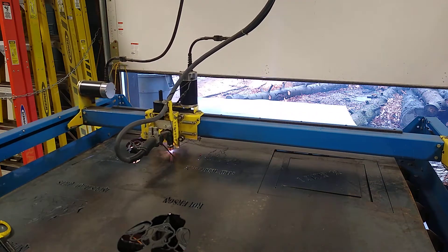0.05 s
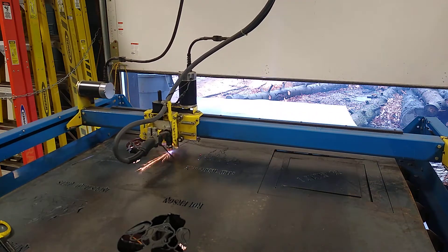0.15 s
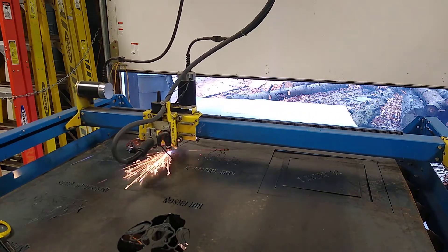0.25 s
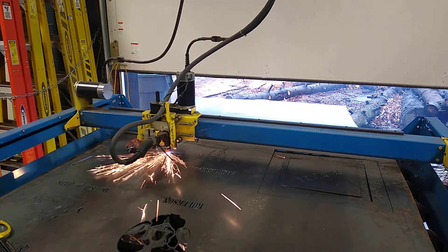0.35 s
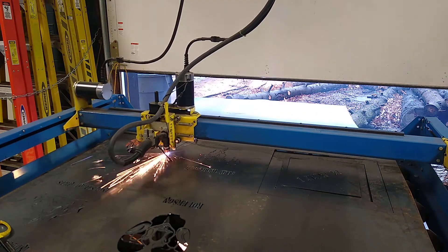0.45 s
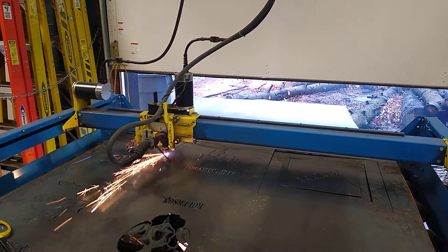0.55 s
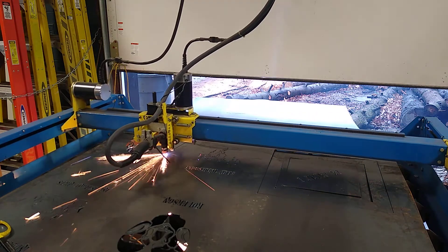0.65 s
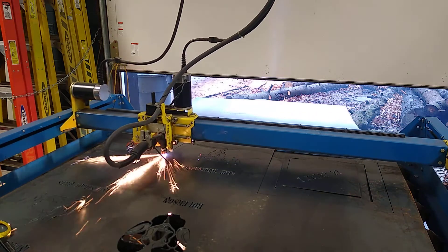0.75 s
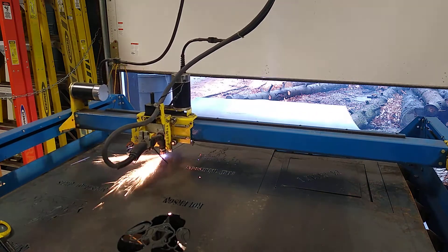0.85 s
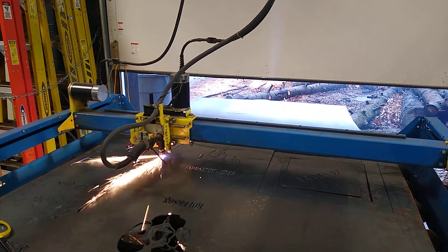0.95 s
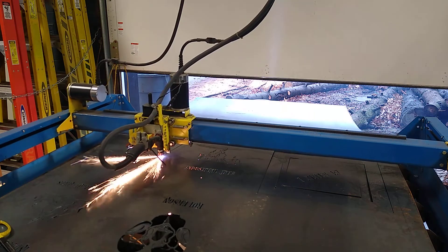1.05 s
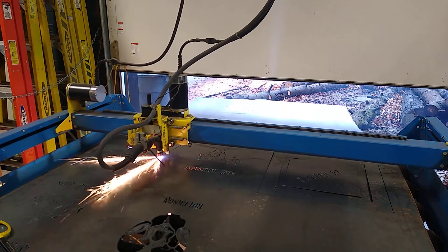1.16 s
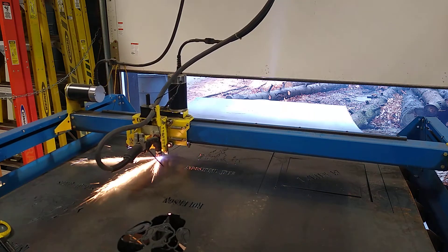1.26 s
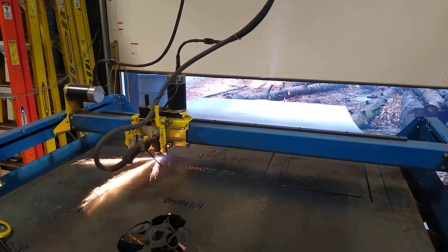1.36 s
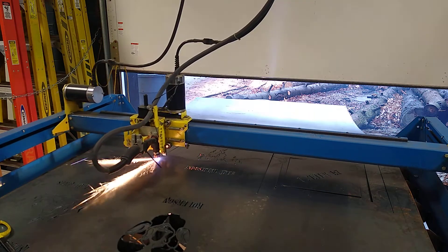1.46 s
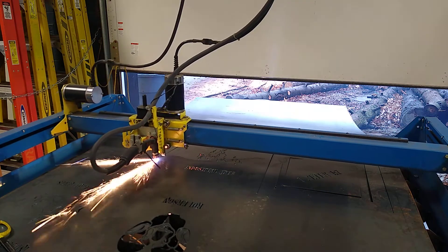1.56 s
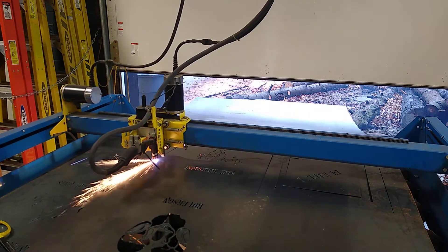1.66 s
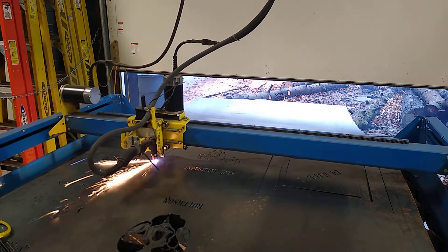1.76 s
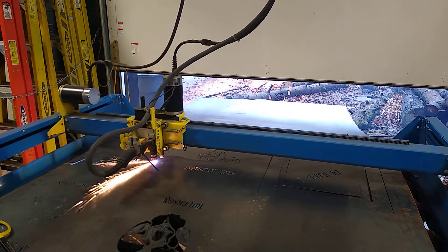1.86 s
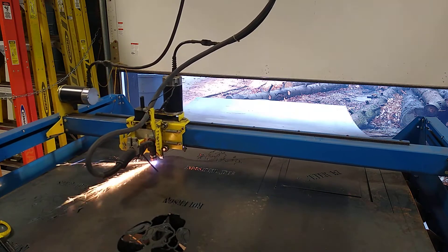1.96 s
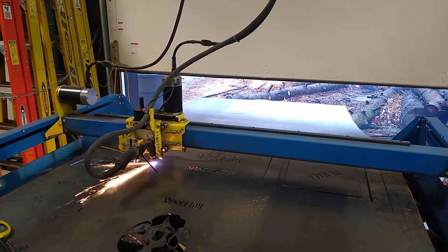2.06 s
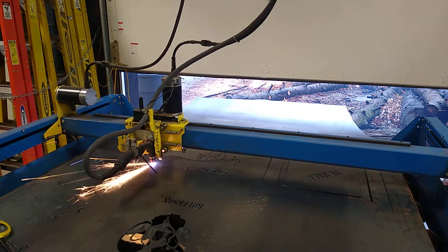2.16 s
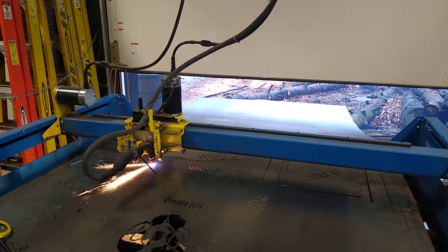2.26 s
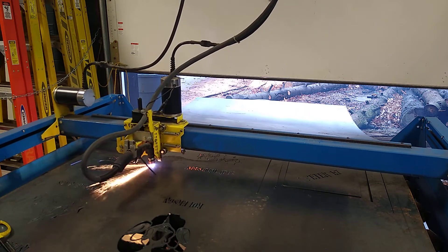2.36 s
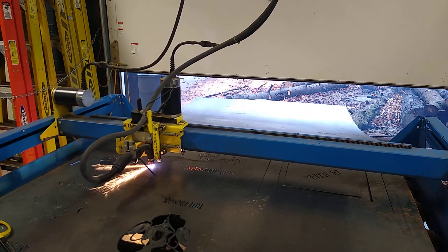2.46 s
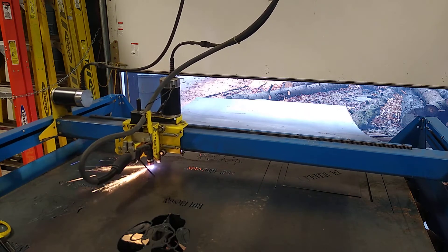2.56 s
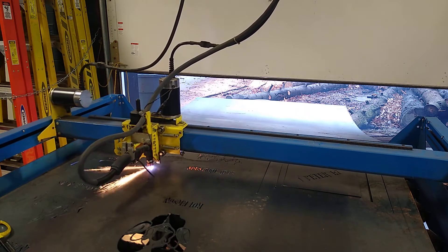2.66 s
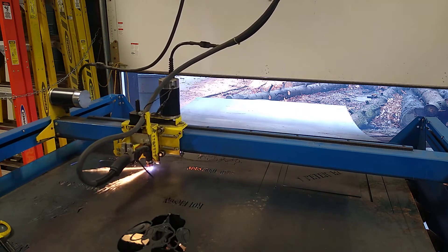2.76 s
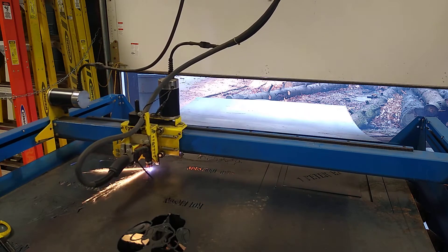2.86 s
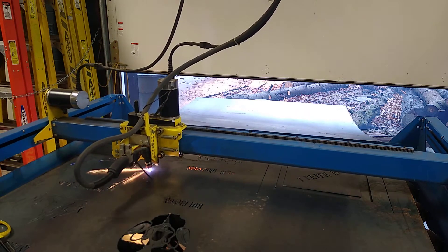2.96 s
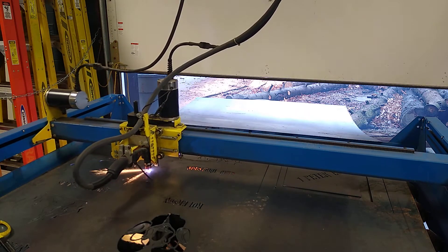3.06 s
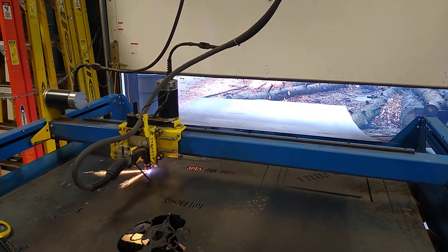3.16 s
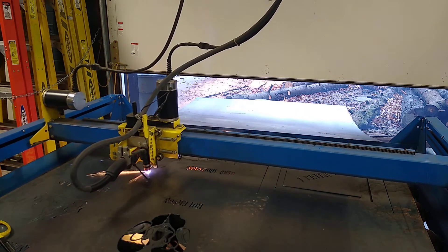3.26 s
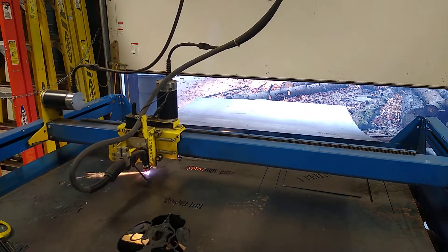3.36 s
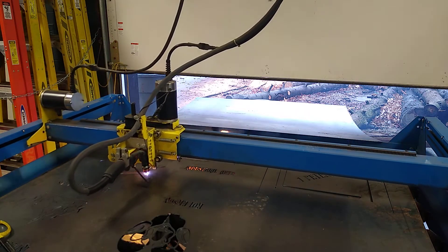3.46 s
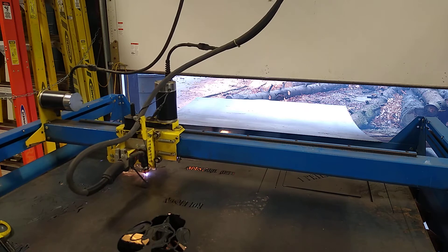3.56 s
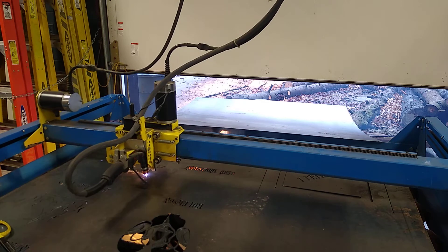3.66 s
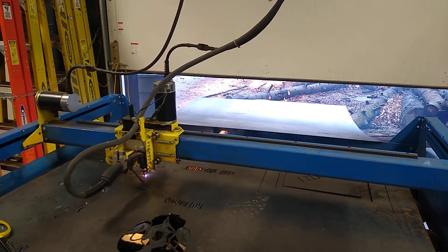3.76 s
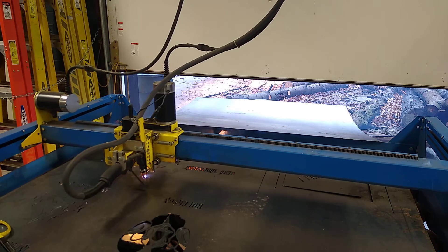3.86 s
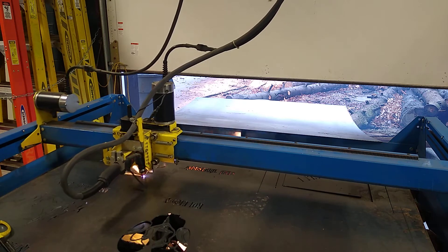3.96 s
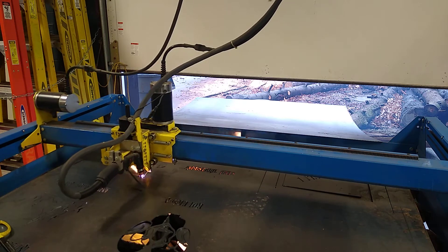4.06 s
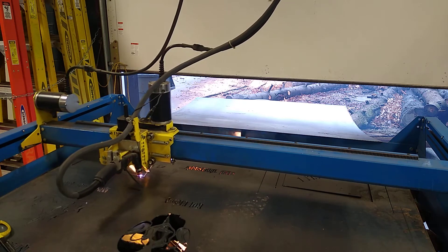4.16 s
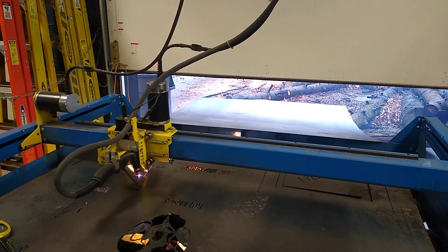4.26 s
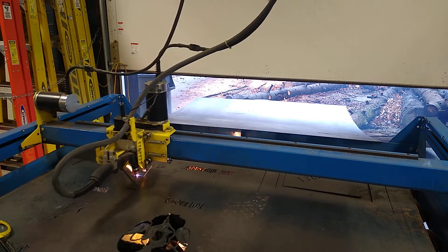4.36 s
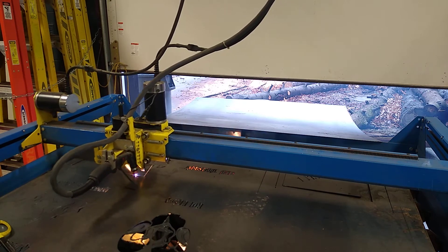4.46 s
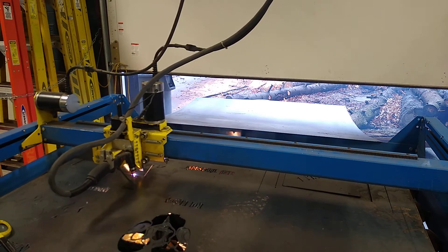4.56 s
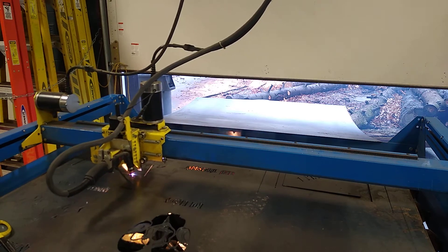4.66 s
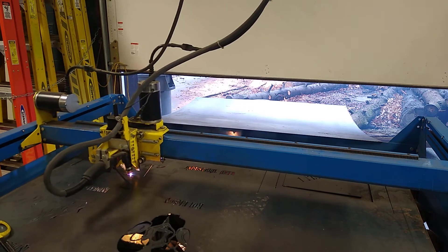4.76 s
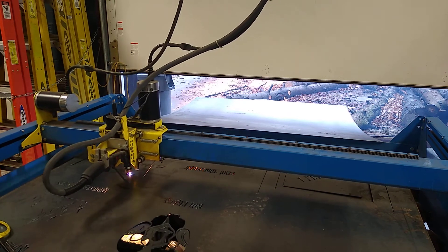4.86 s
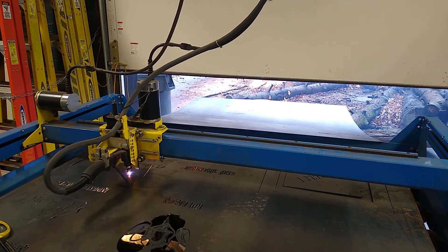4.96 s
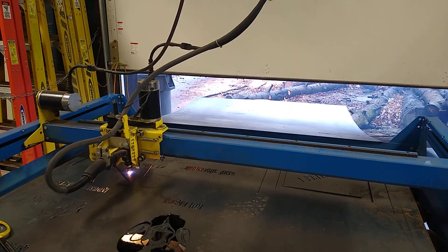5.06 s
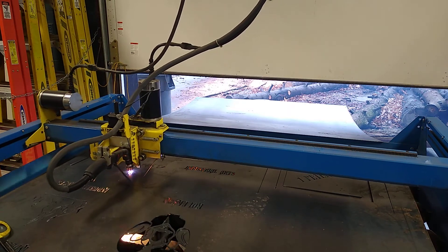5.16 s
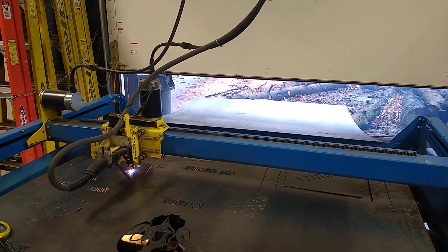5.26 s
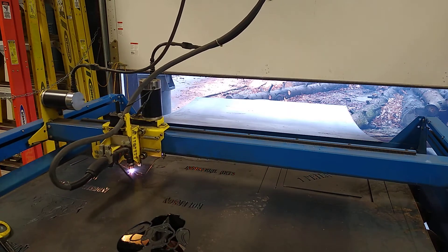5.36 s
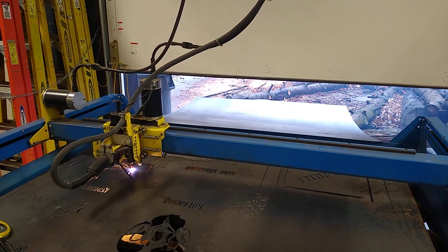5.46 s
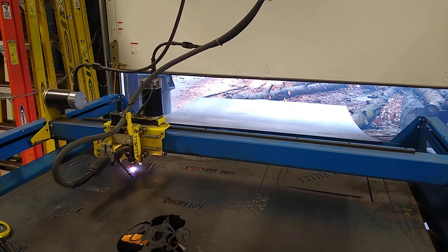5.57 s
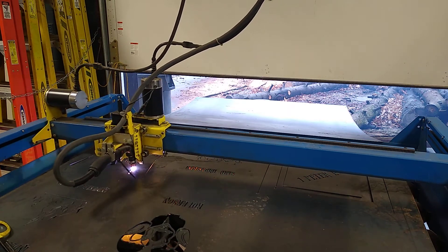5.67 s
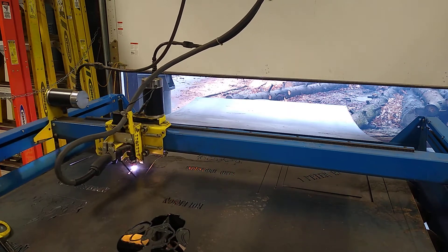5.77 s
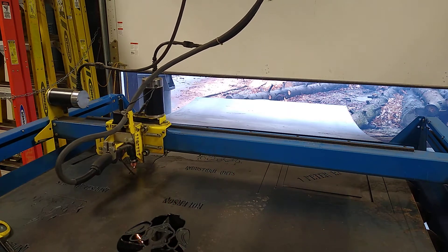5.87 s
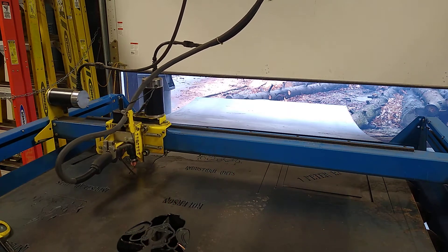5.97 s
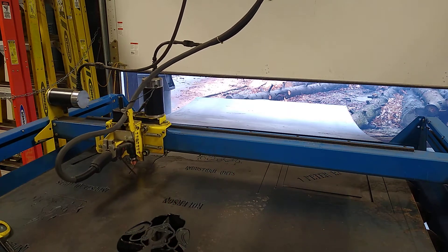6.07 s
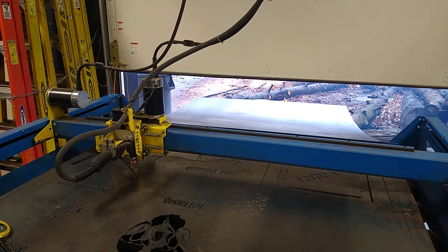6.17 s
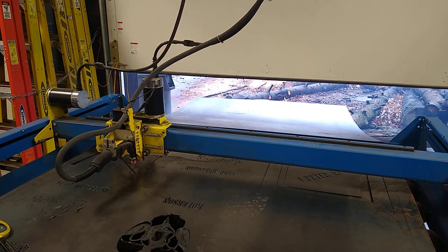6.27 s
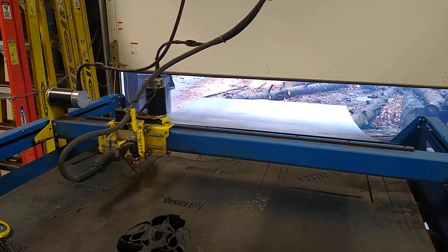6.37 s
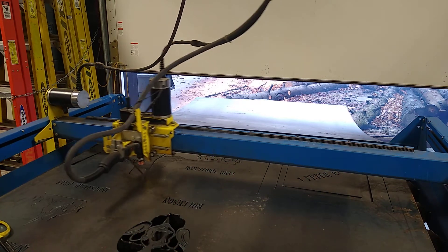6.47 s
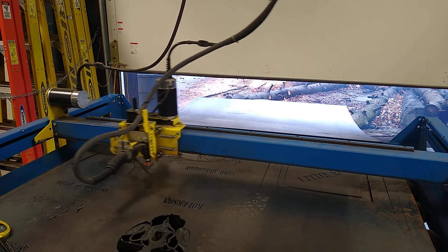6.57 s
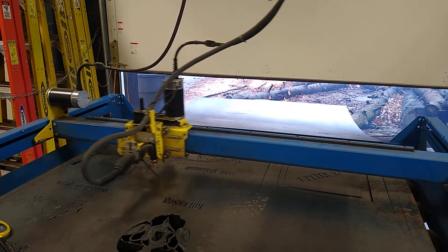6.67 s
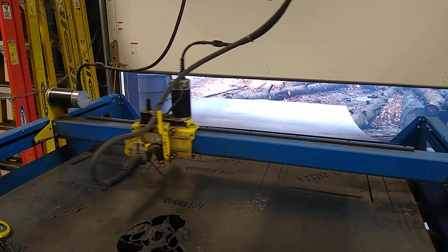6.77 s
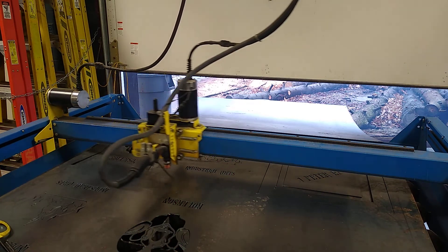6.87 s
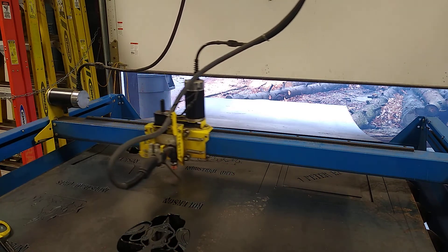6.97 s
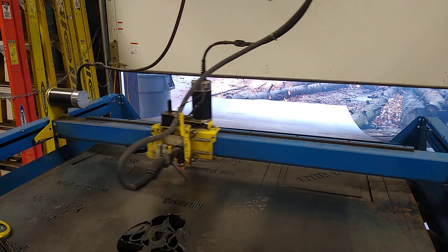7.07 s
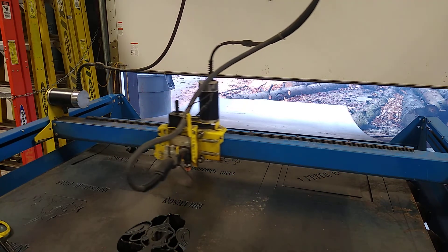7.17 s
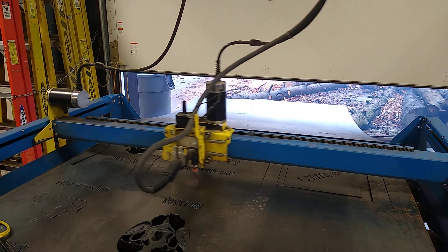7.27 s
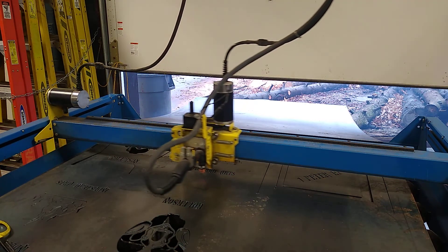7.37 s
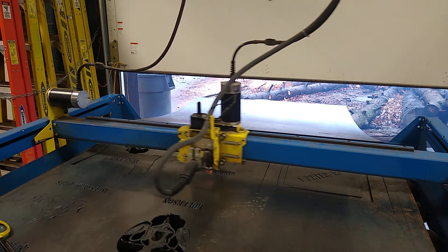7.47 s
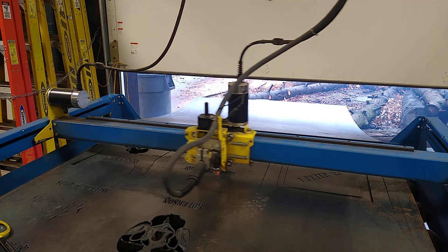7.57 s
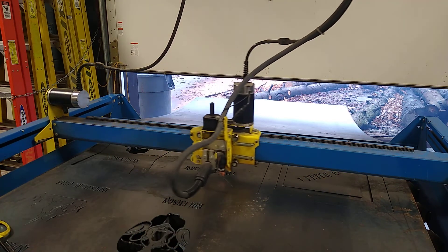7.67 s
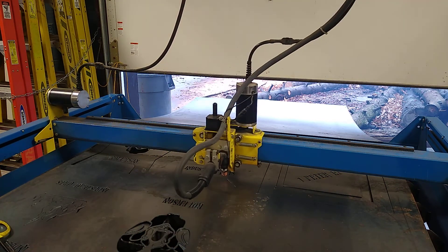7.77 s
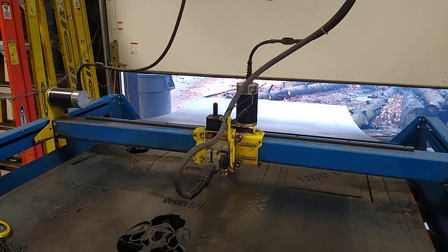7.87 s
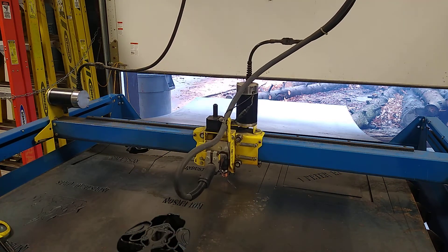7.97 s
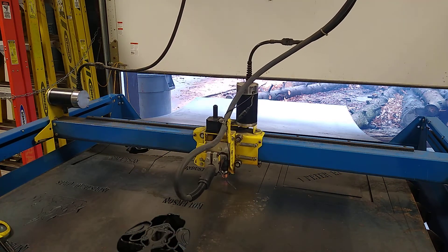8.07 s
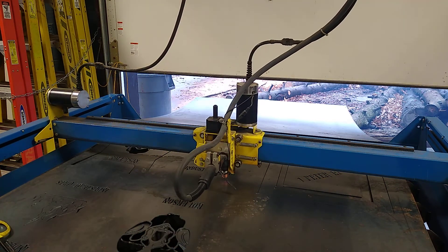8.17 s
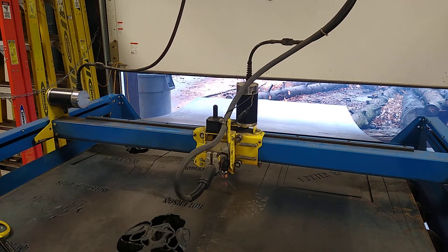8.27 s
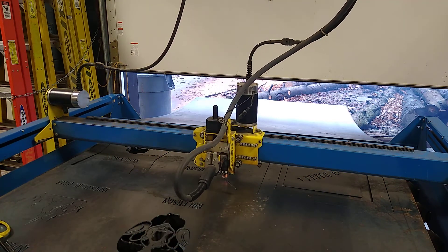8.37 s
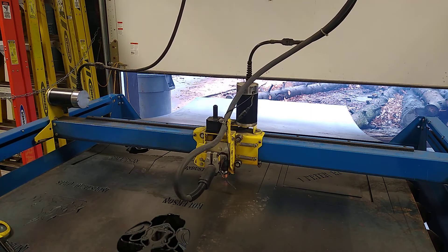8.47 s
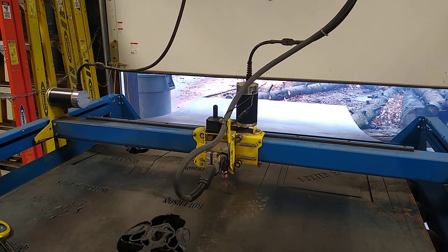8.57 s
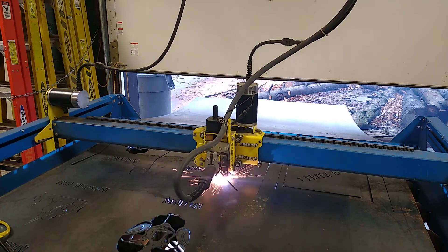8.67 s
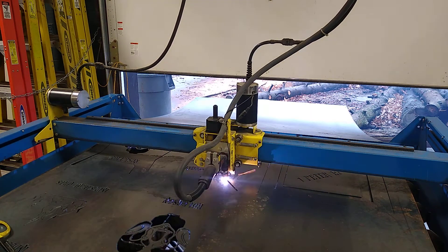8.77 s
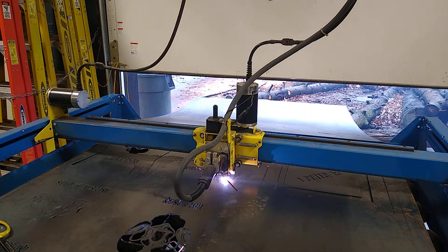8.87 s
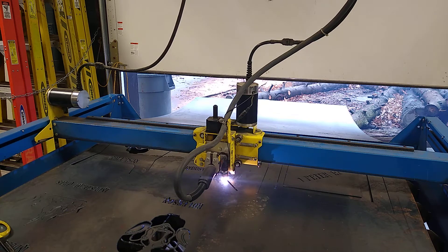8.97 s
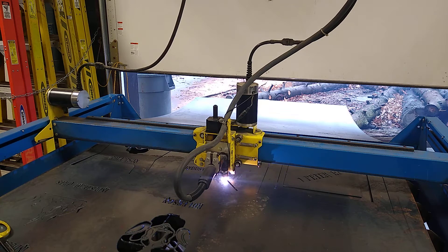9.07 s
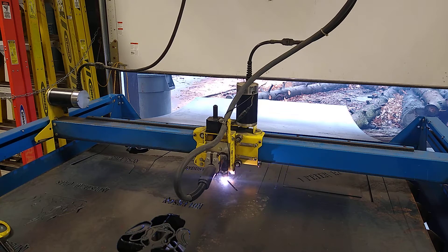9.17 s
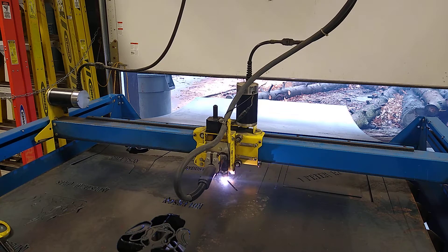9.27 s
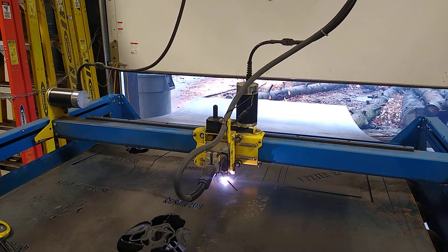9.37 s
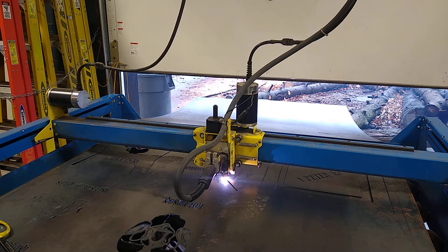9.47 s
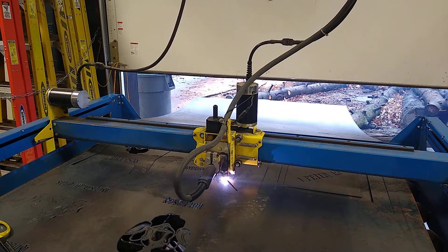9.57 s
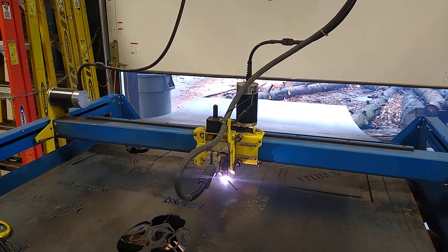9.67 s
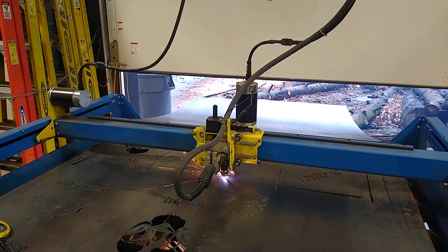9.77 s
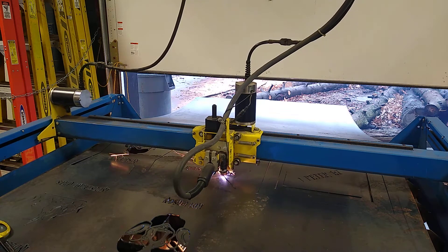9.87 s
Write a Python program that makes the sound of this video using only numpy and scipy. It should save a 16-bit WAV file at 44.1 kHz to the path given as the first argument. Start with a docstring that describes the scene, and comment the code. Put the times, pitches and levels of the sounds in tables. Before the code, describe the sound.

Steady airy hiss with a thin whistle and crackling roar of plasma cutting, arc out, air shut off, sharp relighting snaps and loud bright hiss, machinery droning.

```python
"""A workshop, where a gantry plasma torch cuts steel plate over an air compressor's drone and a mains hum.
The air jet is shaped noise that hisses, with moving resonances that whistle in the kerf.
The arc is sputtering noise that roars most in its flares; it goes out and the air keeps blowing as the torch travels.
The air dies away, then snaps of resonant noise relight the arc, which pierces a new hole with a bright hiss.
The compressor repeats a stroke built from partials; hum, motor whines and fan noise fill the background."""
import sys
import numpy as np
from scipy import signal
from scipy.fft import rfft, irfft, next_fast_len
from scipy.io import wavfile
from scipy.ndimage import uniform_filter1d, map_coordinates

SR = 44100
rng = np.random.default_rng(int(sys.argv[2]) if len(sys.argv) > 2 else 0)


def generate_wav(sig):
    """Save sig (samples, or channels by samples) to the path in sys.argv[1] as 16-bit PCM at SR."""
    pcm = np.round(np.clip(np.atleast_2d(sig).T, -1, 1) * 32767).astype(np.int16)
    wavfile.write(sys.argv[1], SR, pcm)


N = 437472
T = np.arange(N) / SR  # time of each sample in seconds

# The torch's cycle in seconds: the cutting arc goes out, the air valve shuts and reopens,
# the new arc takes hold and starts to sink through.
ARC_OFF_S, AIR_OFF_S, AIR_ON_S, PIERCE_S, SINK_S = 5.97, 8.375, 8.706, 8.778, 9.66
# The whistle's pitch drifts as the torch moves along. Each row: time in seconds, pitch in Hz.
KERF_PITCH = [(0.7, 5074), (3.5, 4936), (5.4, 4756), (5.75, 4865), (6.3, 4716), (8.3, 4910)]
# Resonances of the gap under the nozzle. Each row: multiple of the whistle pitch, width in Hz,
# relative level in dB.
GAP_MODES = [(.76, 220, -11.5), (1, 170, -4.5), (1.06, 150, -7.5), (1.17, 290, -17), (1, 930, -2.5)]
# The arc flares as it meets fresh metal. Each row: start in seconds, length in seconds,
# rise and fall in seconds, then the relative levels of hiss, roar and whistle in dB.
FLARES = [(0.216, 0.16, 0.1, -36, -32.5, -31), (0.44, 0.285, 0.055, -32, -34.5, -25),
          (0.603, 0.1, 0.065, -38, -33, -20), (1.548, 0.13, 0.1, -37, -31, -30),
          (1.714, 0.75, 0.37, -37.5, -35.5, -33), (3.445, 0.16, 0.06, -35, -37, -29.5),
          (5.08, 0.22, 0.12, -46, -37.5, -36), (5.38, 0.575, 0.04, -35, -36, -30.5),
          (5.588, 0.3, 0.08, -43.5, -29.5, -35), (5.669, 0.085, 0.056, -33.5, -26.5, -23.5)]
# Puffs of air with the arc out. Each row: start in seconds, length in seconds, rise in seconds,
# fall in seconds, relative level in dB.
AIR_PUFFS = [(5.98, 0.37, 0.34, 0.14, -39), (6.302, 0.065, 0.05, 0.04, -37),
             (8.275, 0.037, 0.027, 0.13, -35)]
# The crater rings until the arc breaks through. The one row: start in seconds, length in seconds,
# rise in seconds, fall in seconds, relative level in dB.
CRATER_RING = (9, 0.7, 0.3, 0.12, -38)
# Ignition snaps. Each row: start in seconds, relative level in dB, rise time constant in seconds,
# time to decay by 60 dB in seconds, centre in Hz, width in Hz.
SNAPS = [(8.7245, -10, 0.0015, 0.014, 3200, 2380), (8.741, -21.5, 0.0024, 0.08, 4900, 1400),
         (8.7507, -13.5, 0.00054, 0.018, 4480, 2000)]
# Noise colours of the air jet, the cutting roar, the piercing flame, the spatter and the shop's fans.
# Each row: frequency in Hz, relative spectrum level in dB per Hz.
AIR_COLOUR = [(150, -45), (500, -20.5), (1000, -6), (1700, 0.5), (2400, -0.5), (3100, 2), (3420, 5),
              (3700, 2.5), (4400, 4), (5300, 4), (6100, 0), (6800, 0.5), (7400, 0.5), (8500, -7.5)]
ROAR_COLOUR = [(120, -44), (400, -23.5), (900, -5), (1350, -11.5), (1600, 0), (1900, 2), (2300, -3.5),
               (2650, 1), (3000, -1), (3450, -2), (4400, 0), (6000, -13), (8000, -21)]
FLAME_COLOUR = [(500, -59), (2400, -11.5), (2850, -9), (3250, -11), (3900, -3), (4300, -3), (4720, 1),
                (5100, 0.5), (5700, -4.5), (5950, -2.5), (6300, -6), (7200, -7.5), (7700, -14.5),
                (8600, -18)]
SPATTER_COLOUR = [(100, -45), (250, -16), (500, -6.5), (1050, -2), (1350, -4.5), (1650, 1.5), (2050, -3),
                  (2850, -3), (3300, -7), (6000, -17), (8600, -25)]
SHOP_COLOUR = [(20, -56), (45, -19.5), (90, -9.5), (140, -0.5), (300, -8), (420, -1), (520, -3),
               (700, -0.5), (1200, 0.5), (1700, 0.5), (2500, -4.5), (3400, -3.5), (5000, -8.5), (6500, -23),
               (8400, -30)]
SHAFT_HZ = 22.603
# The compressor's strong partials. Each row: multiple of the shaft speed, relative level in dB.
PUMP_PARTIALS = [(4, -51.5), (8, -59.5), (10, -51.5), (12, -53), (14, -51), (15, -54.5), (16, -54),
                 (18, -44.5), (19, -53), (27, -49.5), (29, -46.5), (30, -50.5), (31, -40), (32, -57),
                 (33, -45.5), (34, -52.5), (42, -49.5), (48, -49), (49, -53), (50, -52.5), (52, -47.5),
                 (53, -51), (54, -45), (55, -46.5), (57, -55.5), (66, -55.5), (67, -51), (68, -55.5),
                 (69, -52), (71, -57.5)]
# Its loudest partial swells and sinks. Each row: time in seconds, relative level in dB.
DRONE_SWELL = [(0, -45.5), (1.8, -42.5), (3.5, -39), (5.4, -39.5), (6.5, -37), (7.7, -38), (8.6, -47.5),
               (9.1, -55), (9.92, -50)]
# Outline of its weak partials. Each row: frequency in Hz, relative level in dB of each partial.
PUMP_BED = [(25, -87), (70, -67.5), (150, -57.5), (450, -60.5), (1000, -68.5), (1700, -56), (2400, -61.5),
            (3400, -63), (4500, -67.5)]
# The duller drone. Each row: frequency in Hz, relative level in dB of each partial.
DULL_PUMP = [(25, -85), (60, -70.5), (90, -54), (200, -61), (320, -53), (400, -56), (550, -63),
             (660, -45.5), (800, -72), (1250, -58.5), (2500, -68), (4300, -73)]
# Late on the drone turns duller and more even: start and length of the change in seconds,
# share of the duller colour (0-1).
DULL_S, DULL_OVER_S, DULL_SHARE = 8.9, 0.57, 0.59
MAINS_HZ = 60
# Harmonics of the hum. Each row: multiple of the mains frequency, level in dB.
HUM = [(2, -44.5), (3, -56), (4, -61.5)]
# Wavering whines and whistles of motors and fans, and last a steady resonance of the torch nozzle. # Each row:
# frequency in Hz, width in Hz, level in dB.
WHINES = [(168, 0.43, -60.5), (948, 9.7, -53.5), (1222, 12, -52.5), (2010, 1.1, -57.5),
          (2180, 1.1, -51), (3392, 70, -46.5)]
# The microphone's treble. Each row: frequency in Hz, gain in dB.
MIC_TREBLE = [(7000, 0.5), (7700, 3.5), (8000, -5.5), (8300, -11.5), (8600, -35)]
TOP_HZ = 8600  # the microphone's band limit


def air_jet(jet_db=5, whistle_db=-2, flutter_db=0.6, spread_db=-0.25, cut_hiss_db=-42.0,
            cut_whistle_db=-37, free_whistle_db=4.0, even_db=-32):
    """The nozzle hisses; where the jet strikes the kerf edge it adds a breathy whistle."""
    air = blowing()
    hiss_gain = together([air, cutting(cut_hiss_db, column_index=0)])
    hiss = amp(jet_db) * hiss_gain * rush(AIR_COLOUR, patchy_db=0.83)
    edge_gain = together([amp(free_whistle_db) * air, cutting(cut_whistle_db, column_index=2)])
    edge_db = 20 * np.log10(edge_gain)
    edge_hz, = curves(KERF_PITCH)
    modes = [amp(db) * resonance(ratio * edge_hz, width_hz) for ratio, width_hz, db in GAP_MODES]
    # the harder the jet strikes, the less the last, broad resonance counts: the whistle gets purer
    breath_gain = amp(spread_db * (edge_db - even_db))
    whistle = sum(modes[:-1]) + breath_gain * modes[-1]
    return hiss + amp(edge_db + whistle_db + flutter_db * wobble(90)) * whistle


def blowing(flow_db=-43, bleed_db_per_s=105, open_s=0.04):
    """Gain of the plain air flow: steady with a few puffs; the hose bleeds empty while the valve is shut."""
    bleeding = amp(-bleed_db_per_s * np.maximum(T - AIR_OFF_S, 0))
    valve = np.maximum(bleeding, ramp(AIR_ON_S, open_s))
    puffs = [amp(db) * swell(*shape) for *shape, db in AIR_PUFFS]
    return together([amp(flow_db) * valve] + puffs)


def cutting_arc(steady_db=-39, sputter_db=1.46):
    """Molten steel blown from the cut roars and sputters, most when the arc meets fresh metal."""
    sputter = amp(sputter_db * wobble(160))
    return cutting(steady_db, column_index=1) * sputter * rush(ROAR_COLOUR, patchy_db=1.5)


def cutting(steady_db, column_index, out_s=0.055, wander_db=0.5):
    """Gain of one voice of the cut: burning that wanders until the arc goes out, plus the flares."""
    steady = amp(steady_db + wander_db * wobble(5.6)) * (1 - ramp(ARC_OFF_S, out_s))
    flares = [amp(levels[column_index]) * swell(start, length, edge, edge)
              for start, length, edge, *levels in FLARES]
    return together([steady] + flares)


def piercing_arc(flame_db=-22, rise_s=0.062, grow_db_per_s=1.8, sink_db_per_s=22, spray_db=-36.5,
                 spray_db_per_s=5, sputter_db=0.6, surge_db=0.45, crater_hz=1550):
    """The arc digs into fresh plate: bright hiss fading as it sinks in, growing spatter, hollow crater note."""
    age = np.maximum(T - PIERCE_S, 0)
    sinking_db = sink_db_per_s * np.maximum(T - SINK_S, 0)
    hiss_db = flame_db + grow_db_per_s * age - sinking_db + surge_db * wobble(12)
    hiss = amp(hiss_db + sputter_db * wobble(120)) * rush(FLAME_COLOUR, patchy_db=0.5)
    spatter = amp(spray_db + spray_db_per_s * age) * rush(SPATTER_COLOUR, patchy_db=2.5)
    *shape, ring_db = CRATER_RING
    crater = amp(ring_db) * swell(*shape) * resonance(crater_hz, width_hz=73)
    return (hiss + spatter) * ramp(PIERCE_S, rise_s) + crater


def pilot_arc(hiss_db=-37, spit_db=-33, length=0.045, rise=0.028, fall=0.06):
    """A small flame hisses and spits between the first snap and the full arc."""
    hiss = amp(hiss_db) * rush(FLAME_COLOUR, patchy_db=3.0)
    spit = amp(spit_db) * rush(SPATTER_COLOUR, patchy_db=2.5)
    return swell(SNAPS[0][0], length, rise, fall) * (hiss + spit)


def ignition(low_hz=450):
    """The pilot arc strikes in a few short snaps of resonant noise, thinned by a low cut."""
    snaps = np.zeros(N)
    for start, db, rise, t60, centre_hz, width_hz in SNAPS:
        age = np.maximum(T - start, 0)
        envelope = amp(db - 60 * age / t60) * (1 - np.exp(-age / rise))
        snaps += envelope * resonance(centre_hz, width_hz)
    return filtered(snaps, lambda hz: (1j * hz / (low_hz + 1j * hz)) ** 2)


def reflections(x, echo_db, reach, travel, count=8):
    """Plate, gantry and door return weak early copies, whose paths creep as the torch moves."""
    creep = travel * wobble(0.99)  # seconds
    delays = rng.uniform(0.000997, reach, count)  # seconds
    sways = rng.standard_normal(count)
    signs = rng.choice([-1, 1], count)
    copies = sum(sign * np.interp(T - delay - sway * creep, T, x, left=0)
                 for delay, sway, sign in zip(delays, sways, signs))
    return (x + amp(echo_db) * copies / np.sqrt(count)) / np.hypot(1, amp(echo_db))


def compressor(drift=0.0012, flutter_db=0.48, drone_db=-1.0, order=31, count=190, size=8192):
    """Each turn of the shaft repeats one rattling pump stroke, rich in partials."""
    partial_hz = np.arange(count) * SHAFT_HZ
    turns = SHAFT_HZ * T + drift * wobble(3)
    # the shaft speed ripples within each turn, so the drone wavers in pitch rather than level and hardly throbs
    phases = 1.2 * np.arange(count) ** 2 + .4 * rng.standard_normal(count)

    def strokes(gains):
        """One turn built from these partials, repeated at the shaft speed."""
        cycle = irfft(gains * np.exp(1j * phases), size) * size / np.sqrt(2)
        return np.interp(turns % 1, np.arange(size) / size, cycle)

    strong, strong_db = np.transpose(PUMP_PARTIALS)
    gains = amp(along(PUMP_BED, partial_hz))
    gains[np.rint(strong).astype(int)] = amp(strong_db)
    gains[order] = 0  # the loudest partial has its own swell
    swell_db, = curves(DRONE_SWELL)
    drone = amp(swell_db + drone_db) * np.sqrt(2) * np.cos(2 * np.pi * order * turns + phases[order])
    dull_gains = amp(along(DULL_PUMP, partial_hz))
    dull = DULL_SHARE * ramp(DULL_S, DULL_OVER_S)
    rattle = (1 - dull) * strokes(gains) + dull * strokes(dull_gains)
    return rattle * amp(flutter_db * wobble(14)) + drone


def workshop(air_db=-35.5):
    """Transformer hum as sines, motor whines and the nozzle's ring as narrow wavering resonances, and fans as
    shaped noise."""
    hum = sum(amp(db) * np.sin(2 * np.pi * (round(multiple) * MAINS_HZ * T + rng.random()))
              for multiple, db in HUM)
    whines = sum(amp(db) * resonance(hz, width_hz) for hz, width_hz, db in WHINES)
    fans = amp(air_db) * rush(SHOP_COLOUR, patchy_db=1.5)
    return np.sqrt(2) * hum + whines + fans


def rush(spectrum, patchy_db):
    """Turbulent noise of rms 1, with eddies of random gain in time and frequency."""
    z = signal.stft(rng.standard_normal(N), nperseg=512)[2]
    eddies = uniform_filter1d(rng.standard_normal(z.shape), size=4, axis=0)  # smooth in frequency
    eddies = uniform_filter1d(eddies, size=14, axis=1)  # smooth in time
    noise = signal.istft(z * amp(patchy_db * unit(eddies)), nperseg=512)[1][:N]
    return unit(filtered(noise, lambda hz: amp(along(spectrum, hz))))


def resonance(centre_hz, width_hz):
    """Noise of rms 1 in one resonance, whose centre may move."""
    def slow_noise():
        """Noise around 0 Hz, which the carrier lifts to the centre."""
        return filtered(rng.standard_normal(N), lambda hz: 1 / (1 + (hz / width_hz) ** 2))

    phase = 2 * np.pi * np.cumsum(centre_hz * np.ones(N)) / SR
    return unit(slow_noise() * np.cos(phase) + slow_noise() * np.sin(phase))


def wobble(rate, count=2000):
    """A smooth random curve, rate knots a second."""
    coarse = T[::32]
    knots = rng.standard_normal(count)
    return np.interp(T, coarse, map_coordinates(knots, [coarse * rate], mode="mirror"))


def ramp(start, length):
    """A smooth step from 0 to 1."""
    return np.sin(np.pi / 2 * np.clip((T - start) / length, 0, 1))


def swell(start, length, rise, fall):
    """Attack, hold, and a release that begins length seconds after the start."""
    return ramp(start, rise) * (1 - np.clip((T - start - length) / fall, 0, 1))


def together(gains):
    """Unrelated noises add in power."""
    return np.sqrt(sum(g ** 2 for g in gains) + 1e-12)


def filtered(x, response):
    """x times a response of frequency."""
    size = next_fast_len(N + SR // 2)
    return irfft(rfft(x, size) * response(np.fft.rfftfreq(size, 1 / SR)), size)[:N]


def along(points, hz):
    """Read (Hz, value) points on a log frequency axis."""
    f, v = np.transpose(points)
    return np.interp(np.log(hz + 1), np.log(f + 1), v)


def curves(rows):
    """One value per sample for each column after the time."""
    s, *cols = np.transpose(rows)
    return [np.interp(T, s, c) for c in cols]


def amp(db):
    """Turn dB into a gain."""
    return 10 ** (np.asarray(db) / 20)


def unit(x):
    """Scale to rms 1."""
    return x / np.sqrt(np.mean(x ** 2) + 1e-20)


def scene(torch_db=0.8, pump_db=-0.5):
    """The torch with its early reflections, in the noise of the shop; both channels alike."""
    torch = air_jet() + cutting_arc() + piercing_arc() + pilot_arc() + ignition()
    torch = reflections(torch, echo_db=-7.0, reach=.012, travel=0.0001174)
    mono = amp(torch_db) * torch + amp(pump_db) * compressor() + workshop()
    return np.array([mono, mono])


def record(dry):
    """The microphone shapes the top treble and keeps nothing above its band limit."""
    return np.array([filtered(x, lambda hz: amp(along(MIC_TREBLE, hz)) * (hz < TOP_HZ)) for x in dry])


dry = scene()
out = record(dry)
generate_wav(out)
```